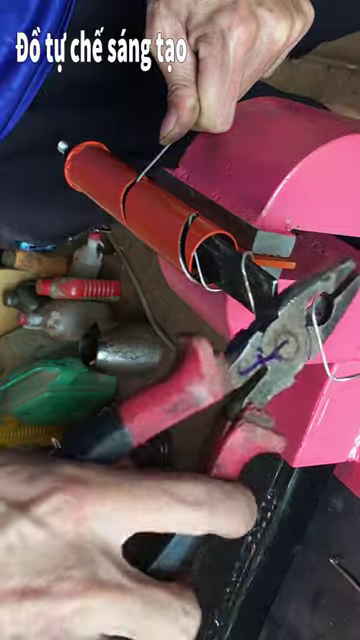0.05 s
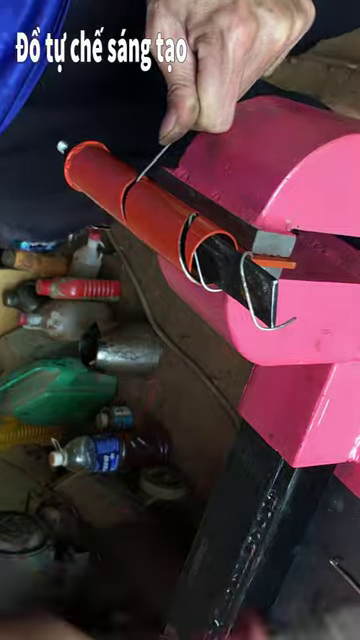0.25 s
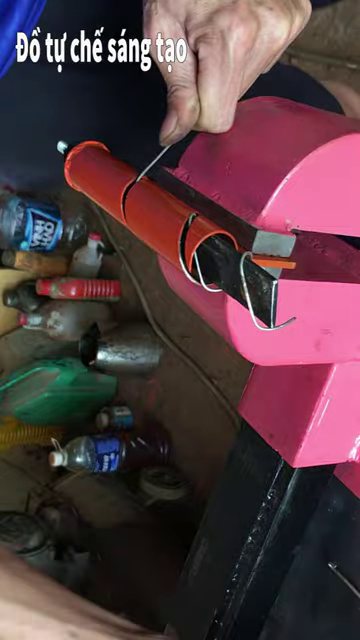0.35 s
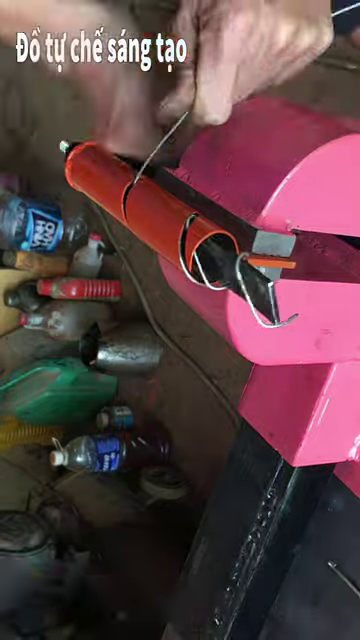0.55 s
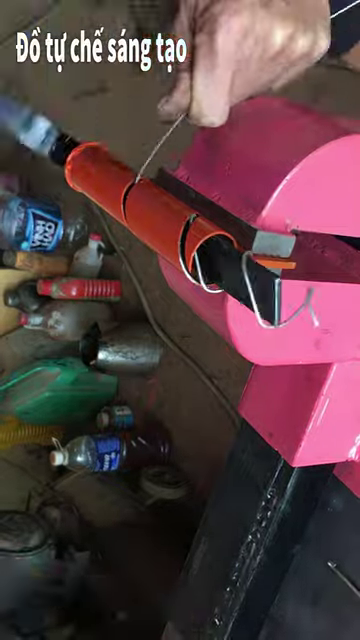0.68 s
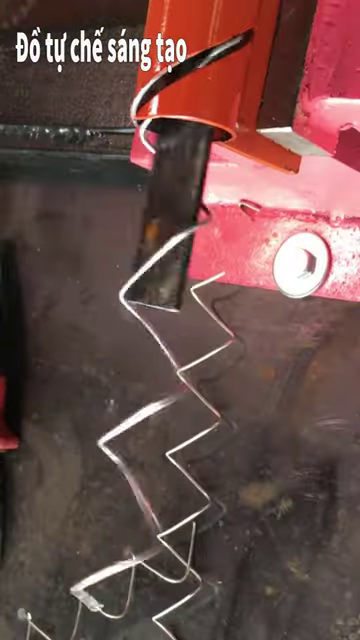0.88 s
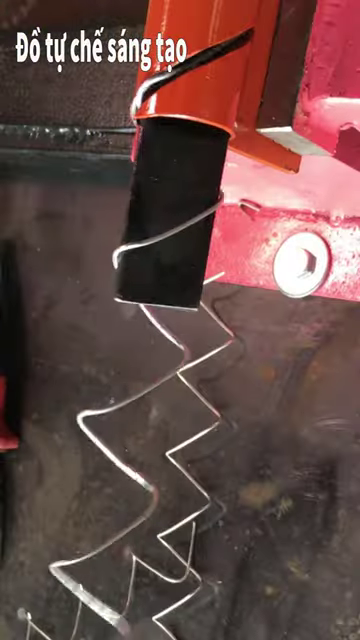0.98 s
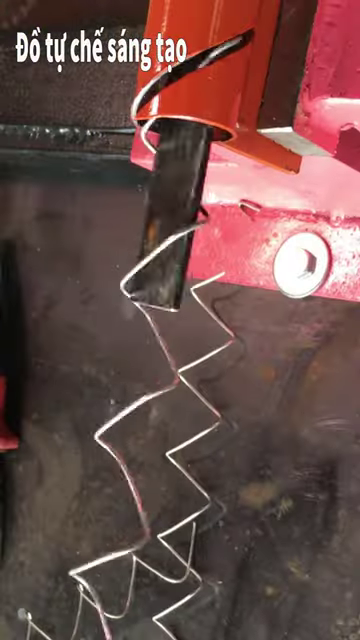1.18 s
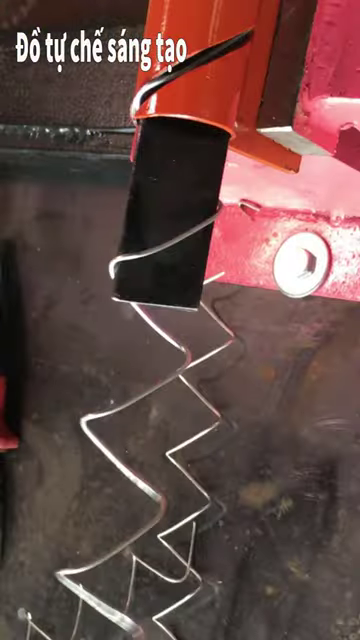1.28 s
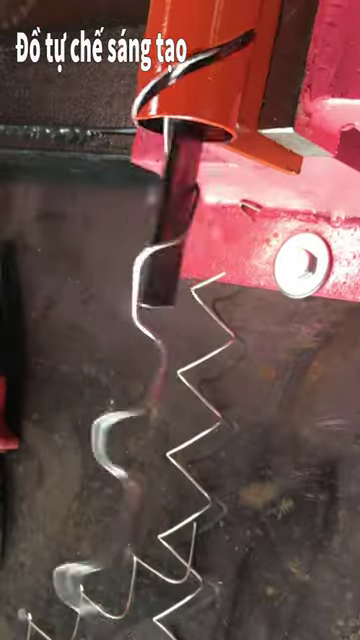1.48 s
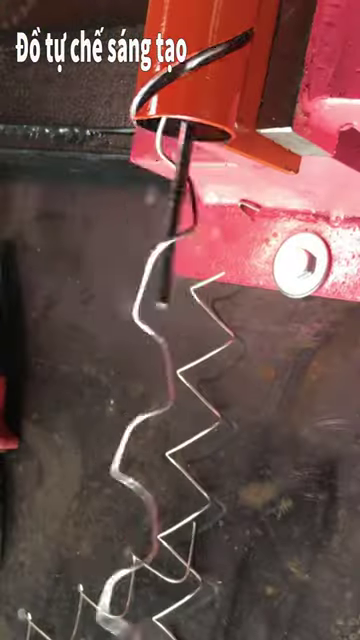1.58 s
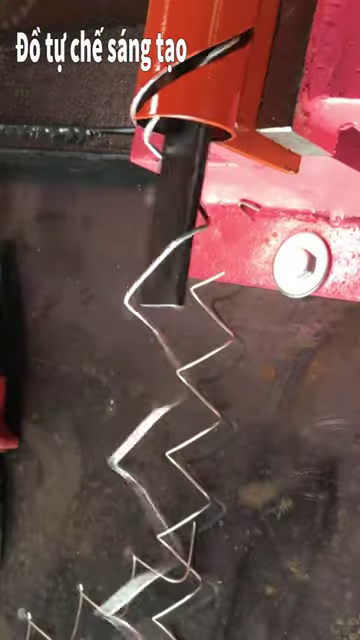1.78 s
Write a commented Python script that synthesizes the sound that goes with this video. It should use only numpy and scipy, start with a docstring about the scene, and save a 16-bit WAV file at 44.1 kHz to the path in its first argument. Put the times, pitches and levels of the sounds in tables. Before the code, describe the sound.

A small wire-bending machine whines and rumbles up to speed, clicking regularly as wire slips off its blade. Just before, pliers snip the wire and clatter onto the metal frame. Heard close up in a small, hissy workshop.

```python
"""A dry snip over steady workshop hiss: pliers break through a steel wire. The loose end scratches on
the forming blade, and the pliers drop on the machine's frame, clatter and set it ringing. Then a
small geared motor gathers speed, whining and rumbling as it turns the blade. At each half turn the
bent wire slips off with a click and the blade rings faintly. All is heard close up in a small room."""
import sys
import numpy as np
from scipy import signal
from scipy.fft import rfft, irfft
from scipy.io import wavfile
from scipy.ndimage import uniform_filter1d

SR = 44100
rng = np.random.default_rng(int(sys.argv[2]) if len(sys.argv) > 2 else 0)


def wav_record(signal):
    """Record a signal, one row per channel, as 16-bit PCM in the file named by sys.argv[1]."""
    frames = np.transpose(np.atleast_2d(signal))
    bounded = np.clip(frames, -1, 1)
    # unit amplitude maps onto the largest positive 16-bit level
    quanta = np.round(bounded * 32767).astype(np.int16)
    wavfile.write(sys.argv[1], SR, quanta)


N = 81585


def undb(db):
    """Decibels to gain."""
    return 10 ** (np.asarray(db) / 20)


def unit(x):
    """Scale to an energy of 1."""
    return x / np.sqrt(np.sum(x ** 2))


def fade(t60):
    """Half a second of decay, falling 60 dB every t60 seconds."""
    return np.exp(-np.log(1000) * np.arange(SR // 2) / SR / max(t60, 1e-4))


def colour(x, points, tilt=0, size=2048):
    """Causal EQ through (Hz, dB) points, tilted in dB per octave; keeps the energy of white noise."""
    hz, db = np.array(points).T
    octave = np.log2(np.maximum(np.fft.rfftfreq(size, 1 / SR), 1))
    curve_db = np.interp(octave, np.log2(hz), db) + tilt * np.maximum(octave, np.log2(hz[0]))
    cepstrum = irfft(np.log(undb(curve_db)))
    cepstrum[1:size // 2] *= 2  # minimum phase keeps attacks sharp
    cepstrum[size // 2 + 1:] = 0
    impulse = unit(irfft(np.exp(rfft(cepstrum))))
    return signal.fftconvolve(x, impulse)[:len(x)]


def burst(t60):
    """Dense, dying vibration: decaying noise of unit energy."""
    return unit(rng.standard_normal(SR // 2) * fade(t60))


def ring(modes, tilt=0, scatter_db=2, detune=0.0045, low_hz=140):
    """Struck metal: modes tilted in dB per octave about 1 kHz, their mix and tuning new at each blow."""
    t = np.arange(SR // 2) / SR
    tone = 0
    for k, (hz, db, t60) in enumerate(modes):
        gain = undb(db + tilt * np.log2(hz / 1000) + scatter_db * rng.standard_normal())
        pitch = hz * (1 + detune * rng.standard_normal())
        tone += (-1) ** k * gain * fade(t60) * np.sin(2 * np.pi * pitch * t)
    # the ring carries no deep bass
    return signal.sosfilt(signal.butter(3, low_hz, "high", fs=SR, output="sos"), tone)


def place(sounds):
    """Lay (time [s], level [dB], sound) on the timeline."""
    out = np.zeros(N + SR)
    for s, db, x in sounds:
        i = int(max(s, 0) * SR)
        out[i:i + len(x)] += undb(db) * x
    return out[:N]


def drift(rate_hz):
    """Smooth random drift with a spread near 1."""
    hold = max(int(SR / rate_hz), 1)
    return uniform_filter1d(np.repeat(rng.standard_normal(N // hold + 1), hold), hold)[:N]


# room tone EQ (frequency [Hz], gain [dB])
HISS_EQ = [(24, -102), (40, -27.5), (294, -2.5), (368, 0), (472, -9), (535, 0), (881, -8), (949, -5.5),
           (1130, -5.5), (1820, -6), (3390, -1.5), (9890, -7.5), (15500, -18)]

def hiss(level_db=-45, dip_db=-1, dip_s=1):
    """The workshop's bed of hiss, easing down a little as the machine gets going."""
    dip = dip_db * np.clip(np.arange(N) / SR / dip_s, 0, 1)
    return undb(level_db + dip) * colour(rng.standard_normal(N), HISS_EQ)


# motor run-up (time [s], shaft speed [Hz], level [dB])
RUN_UP = [(0, 27.93, -24.5), (.66, 28.22, -9.5), (0.74, 29.97, 0), (0.819, 36.2, -5), (0.999, 56.02, -0.5),
          (1.15, 61.8, -1.5), (1.453, 63.4, -1), (1.58, 67.18, 2), (1.722, 75, 0), (1.85, 75.1, 1.5)]
# partials of the whine (multiple of shaft speed, level [dB])
SHAFT_ORDERS = [(2, -54.5), (4, -55.5), (5, -58), (6, -59), (7, -61.5), (8, -71), (9, -66.5)]
# housing resonances (frequency [Hz], gain [dB])
HOUSING_EQ = [(50, -39), (120, -20.5), (150, -3.5), (200, -5.5), (250, 0.5), (320, -4), (380, 7),
              (440, 0.5), (700, 1)]
# gear rumble EQ (frequency [Hz], gain [dB])
GEAR_EQ = [(60, -45), (110, -20), (160, -1), (260, 1.5), (400, -1), (480, 0.5), (570, 11), (690, -11),
           (830, 4.5), (1000, -12.5), (1230, 0), (1600, -12.5), (9000, -17)]

def motor(wobble=0.0042, flutter_db=2.0, throb=0.37, gear_db=-46.5):
    """Rising shaft harmonics swell through the housing's resonances; the gears throb once a turn."""
    s, hz, db = np.array(RUN_UP).T
    t = np.arange(N) / SR
    speed = np.interp(t, s, hz) * (1 + wobble * drift(rate_hz=20))
    angle = 2 * np.pi * np.cumsum(speed) / SR
    whine = 0
    for order, order_db in SHAFT_ORDERS:
        housing_db = np.interp(order * speed, *np.array(HOUSING_EQ).T)
        gain = undb(order_db + housing_db + flutter_db * drift(rate_hz=16.8))
        whine += gain * np.sqrt(2) * np.sin(order * angle + rng.uniform(0, 2 * np.pi))
    grind = rng.standard_normal(N) * (1 + throb * np.cos(angle))
    gears = undb(gear_db) * colour(grind, GEAR_EQ)
    return undb(np.interp(t, s, db)) * (whine + gears)


# thud cues (time [s], level [dB])
BUMPS = [(0.227, -27), (0.809, -35)]
# boomy thud EQ (frequency [Hz], gain [dB])
BUMP_EQ = [(25, -14), (70, -22), (130, -5), (250, 12), (600, -20), (2000, -59)]

def bumps(t60=0.18):
    """Soft, low thuds; the second comes as the motor starts."""
    return place((s, db, colour(burst(t60), BUMP_EQ)) for s, db in BUMPS)


# frame knocks just after a click (time [s], level [dB])
RATTLES = [(1.3456, -12), (1.363, -18), (1.3742, -12), (1.378, -15), (1.587, -10), (1.8035, -9.5),
           (1.823, -17)]
# dull knock EQ (frequency [Hz], gain [dB])
RATTLE_EQ = [(100, -38), (350, 3.5), (850, -0.5), (1400, -7), (2200, -7), (4000, -15), (12000, -24)]

def frame_rattles(t60=0.072):
    """The machine's frame rattles with dull knocks."""
    return place((s, db, colour(burst(t60), RATTLE_EQ)) for s, db in RATTLES)


# knocks on the blade (time [s], level [dB])
KNOCKS = [(0.2711, -26.5), (.686, -27.5), (0.905, -40), (1.043, -38.5), (1.19, -42), (1.347, -38.5),
          (1.478, -33.5), (1.575, -37.5), (1.69, -43.5), (1.794, -36)]
# blade ring (frequency [Hz], level [dB], t60 [s])
BLADE_MODES = [(523.8, -13, 0.2), (587, -21, 0.15), (800, -24, 0.31), (1166, -7, 0.23), (1197, -6.5, 0.15),
               (1230, -6, 0.13), (1260, -9, 0.37)]

def blade(tilt_per_db=0.66, hard_knock_db=-33):
    """The flat steel blade rings after each knock; softer knocks ring darker."""
    return place((s, db, ring(BLADE_MODES, tilt_per_db * (db - hard_knock_db))) for s, db in KNOCKS)


# light touches (time [s], level [dB], tilt [dB/octave], t60 [s])
TICKS = [(0.594, -14, 17, 0.15), (0.675, -8, -3, 0.25), (0.685, -6.5, 4, 0.019), (0.736, -14.5, -4, 0.089),
         (0.906, -19, 3, 0.12), (0.936, -16, 3, 0.066), (1.0795, -13, 6, 0.0089), (1.203, -16, 4, 0.066),
         (1.229, -19.5, 4, 0.072), (1.3259, -11, -3, 0.07), (1.3705, -22, 7, 0.02),
         (1.4034, -19, 10, 0.037), (1.483, -12.5, 2, 0.14), (1.506, -16, 6, 0.091), (1.569, -9, 3.5, 0.14),
         (1.591, -10.5, 4, 0.061), (1.616, -14, 2, 0.14), (1.6937, -14, 4, 0.081), (1.816, -15, 9, 0.018),
         (1.8415, -14.5, 9, .1)]
# wire contact EQ, for ticks and clicks (frequency [Hz], gain [dB])
WIRE_EQ = [(100, -40), (350, -4), (1100, -3.5), (1600, -11), (2100, 6), (2600, -2), (3250, 5.5), (3800, 1),
           (4600, 4.5), (5400, -2.5), (6700, -4.5), (8000, -1.5), (11000, -7), (12300, -2.5), (13500, -11),
           (15500, -17)]
# wire ring, for ticks and clicks (frequency [Hz], level [dB], t60 [s])
WIRE_MODES = [(1980, -16, 0.09), (3044, -4.5, 0.21), (3190, 1.5, 0.076), (3300, 0.5, 0.095),
              (3360, -3, 0.12), (3680, 0, 0.047), (4235, 0.5, 0.039), (4520, 2, 0.034), (5620, -12, 0.16),
              (12220, -14, 0.06)]

def wire_ticks(modes_db=-35):
    """Wire and linkage touch lightly around the clicks, each tick with a trace of ring."""
    return place((s, db, colour(burst(t60), WIRE_EQ, tilt) + undb(modes_db) * ring(WIRE_MODES))
                 for s, db, tilt, t60 in TICKS)


# slips off the blade (time [s], level [dB], tilt [dB/octave], ring trim [dB])
CLICKS = [(1.0409, -1, 0.7, 3), (1.3333, 1.5, 1.7, 2.5), (1.575, -1, 0.2, 2.5), (1.7878, -9, 11, -25),
          (1.792, -1, 1.5, -4.5)]

def wire_clicks(crack_db=-2, crack_tilt=2.8, body_db=-2.0, body_tilt=-0.94, modes_db=-33):
    """The bent wire snaps off the blade's edge and rings briefly in a cluster of close modes."""
    hits = []
    for s, db, tilt, ring_db in CLICKS:
        crack = undb(crack_db) * colour(burst(t60=0.0049), WIRE_EQ, tilt + crack_tilt)
        body = undb(body_db) * colour(burst(t60=0.056), WIRE_EQ, tilt + body_tilt)
        ping = undb(modes_db + ring_db) * ring(WIRE_MODES)
        hits.append((s, db, crack + body + ping))
    return place(hits)


# skids of the loose end (time [s], level [dB], t60 [s])
SCRATCHES = [(0.234, -15, 0.11), (0.2425, -3, .13), (0.2686, 0.5, 0.037), (0.2731, 2, 0.16),
             (0.3198, -1, 0.11), (0.347, 0, 1)]
# thin, bright rasp EQ (frequency [Hz], gain [dB])
SCRATCH_EQ = [(150, -42), (450, -57), (900, -9), (1200, -7.5), (1600, -8), (2500, -10), (3400, -1.5),
              (4600, -3.5), (7000, -5.5), (11000, -5), (15500, -10)]

def wire_scratches():
    """The freed end skids over the blade in bright rasps, the last one trailing off."""
    return place((s, db, colour(burst(t60), SCRATCH_EQ)) for s, db, t60 in SCRATCHES)


# the cut (time [s], level [dB])
SNIPS = [(0.2201, 5)]
# crisp snip EQ (frequency [Hz], gain [dB])
SNIP_EQ = [(100, -32), (200, -23), (500, -11.5), (1100, -5), (2000, -16.5), (3000, -11.5), (5200, 0.5),
           (7500, -14.5), (11000, -15), (15500, -9.5)]

def snip(shiver_db=-14, shiver_tilt=3.2):
    """The jaws break through the wire: one dry crack and a faint, bright shiver."""
    hits = []
    for s, db in SNIPS:
        crack = colour(burst(t60=0.0032), SNIP_EQ)
        shiver = undb(shiver_db) * colour(burst(t60=0.18), SCRATCH_EQ, shiver_tilt)
        hits.append((s, db, crack + shiver))
    return place(hits)


# pliers hitting the frame (time [s], level [dB], tilt [dB/octave])
DROPS = [(0.3817, 2, -1), (0.388, 5.5, -1), (0.3935, 6, 1.5), (0.4572, 1, -3.5), (0.4643, 13.5, 1.14),
         (0.4724, -1.5, -1), (0.4805, 10, 0)]
# clatter EQ (frequency [Hz], gain [dB])
DROP_EQ = [(100, -46), (190, -18.5), (240, -13.5), (330, -5), (460, 3), (700, 0), (900, 3), (1050, 0),
           (1220, 1), (2000, -2), (2600, -0.5), (3000, 3.5), (3600, -3.5), (4700, -0.5), (6500, -5),
           (9000, -9), (15500, -12)]
# two landings that ring the frame (time [s], level [dB])
LANDINGS = [(0.391, -36), (0.471, -26.5)]
# ring of frame and pliers (frequency [Hz], level [dB], t60 [s])
FRAME_MODES = [(158.4, -24.5, 0.75), (231.6, -7.5, 0.15), (468, 4, 0.08), (583.7, 1.5, 0.28),
               (930, -1, 0.14), (1183, -6, 0.44), (1223, 9, 0.13), (1608, 3, 0.15), (1868, -2, 0.23),
               (2525, -0.5, 0.22), (2760, 5, 0.15), (2984, 7, 0.15), (3040, 9, 0.043), (3780, 5, 0.09),
               (4264, 6.5, 0.14)]

def pliers_drop(crack_db=-6):
    """Handles and jaws land one after another and ring the frame."""
    clatter = []
    for s, db, tilt in DROPS:
        impact = undb(crack_db) * burst(t60=0.063) + burst(t60=0.11)
        clatter.append((s, db, colour(impact, DROP_EQ, tilt)))
    return place(clatter) + place((s, db, ring(FRAME_MODES)) for s, db in LANDINGS)


def scene(room_t60=0.15, room_db=-13):
    """Mono mix: all contacts share a short room tail; motor and hiss sit dry beneath."""
    hits = snip() + wire_scratches() + pliers_drop()
    hits += wire_clicks() + wire_ticks() + frame_rattles() + blade() + bumps()
    room = signal.fftconvolve(hits, burst(room_t60))[:N]
    return (hits + undb(room_db) * room + motor() + hiss())[None]


def record(dry):
    """A steep high cut at 15.75 kHz takes off the very top."""
    return signal.sosfilt(signal.ellip(10, .2, 80, 15750, fs=SR, output="sos"), dry)


dry = scene()
out = record(dry)
wav_record(out)
```